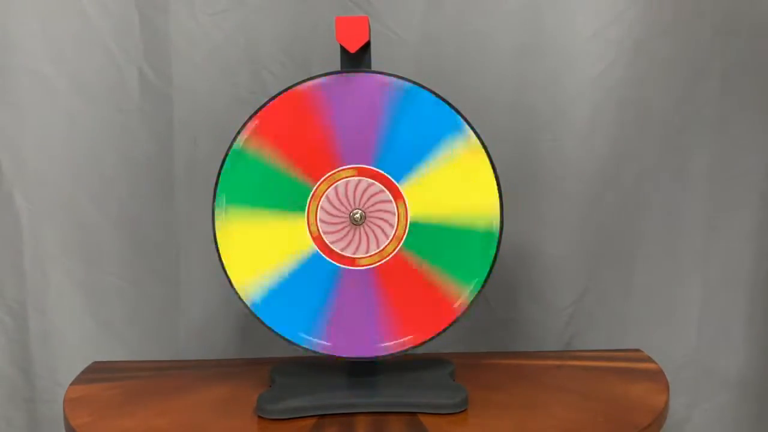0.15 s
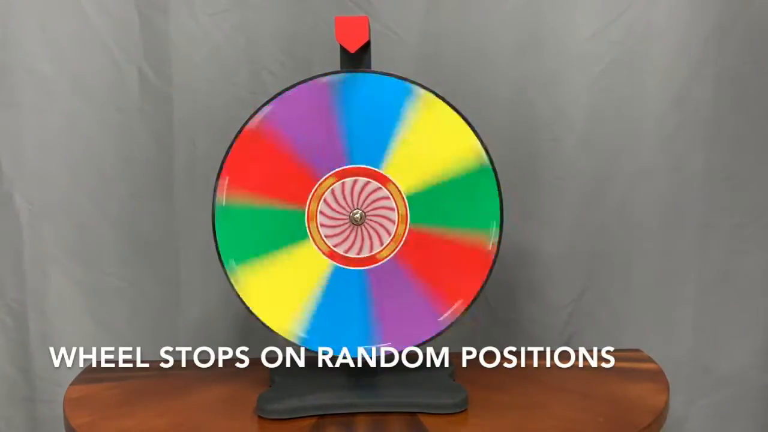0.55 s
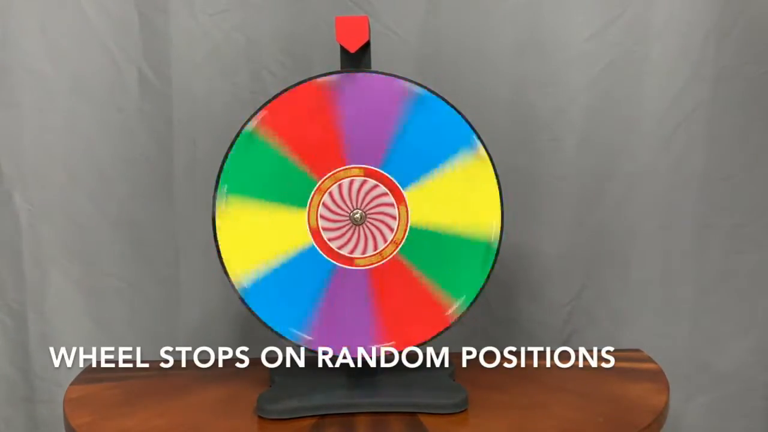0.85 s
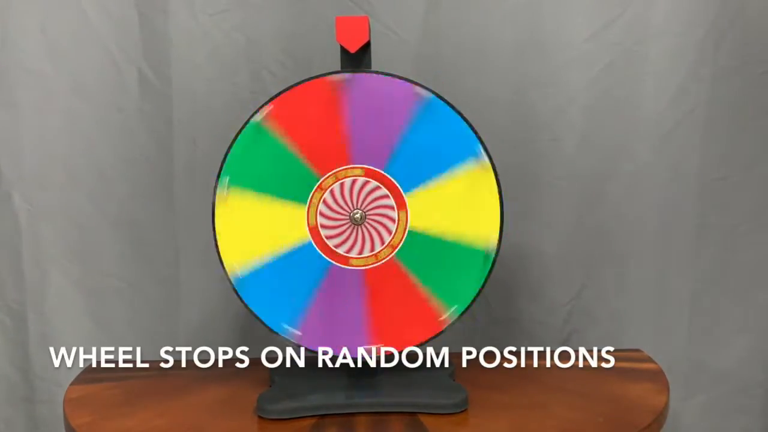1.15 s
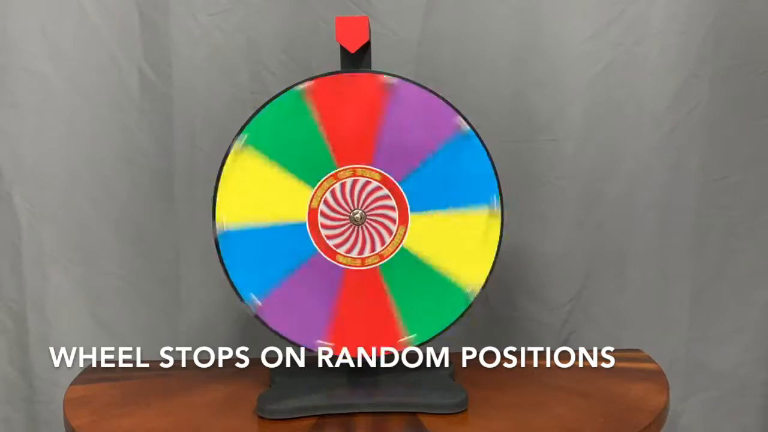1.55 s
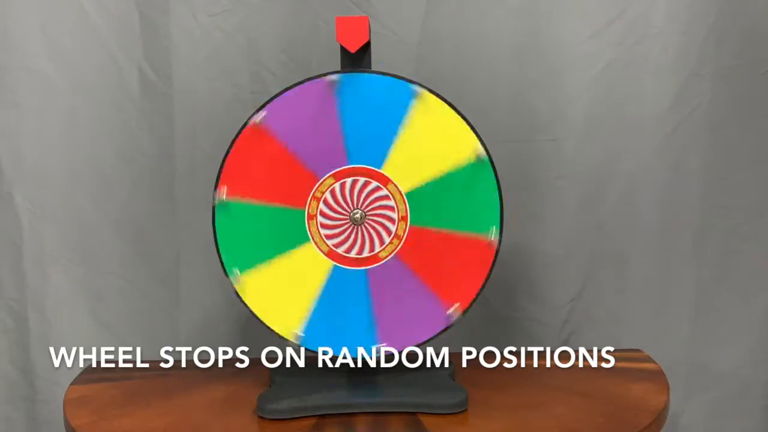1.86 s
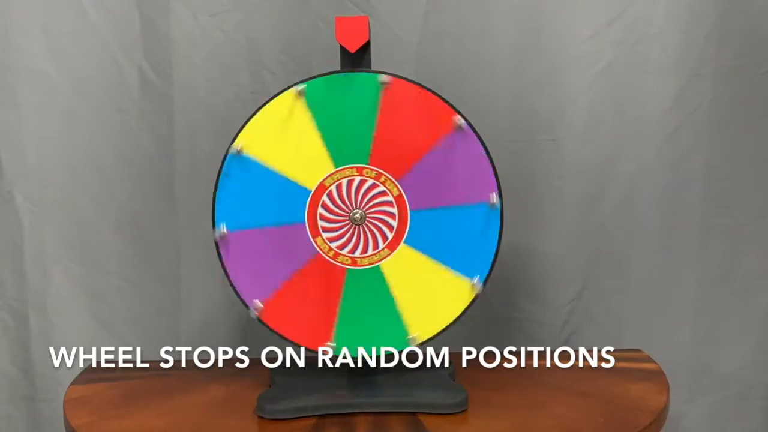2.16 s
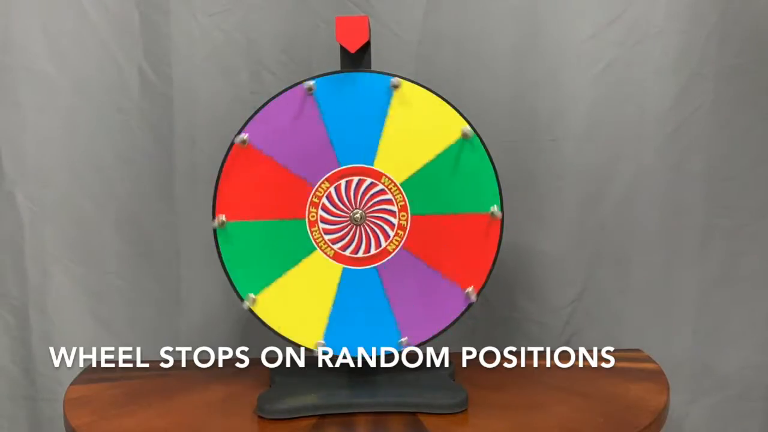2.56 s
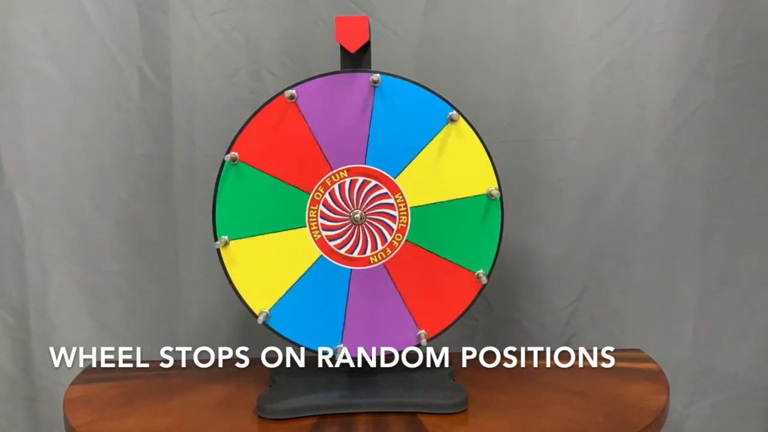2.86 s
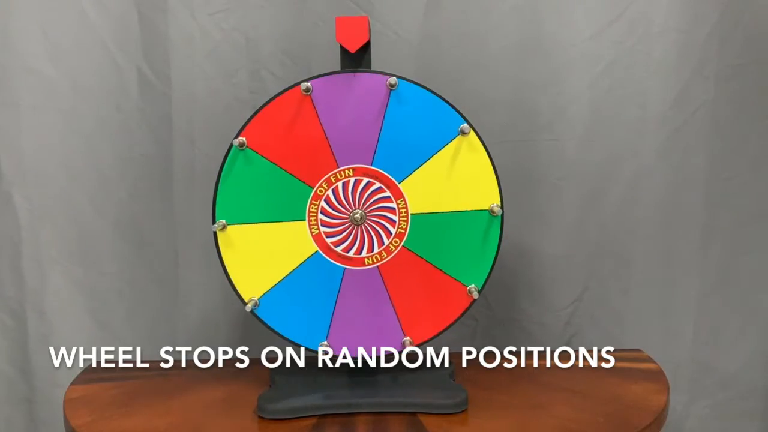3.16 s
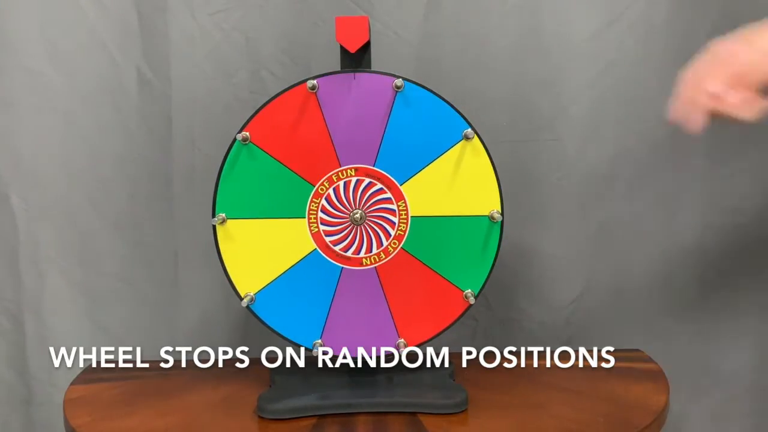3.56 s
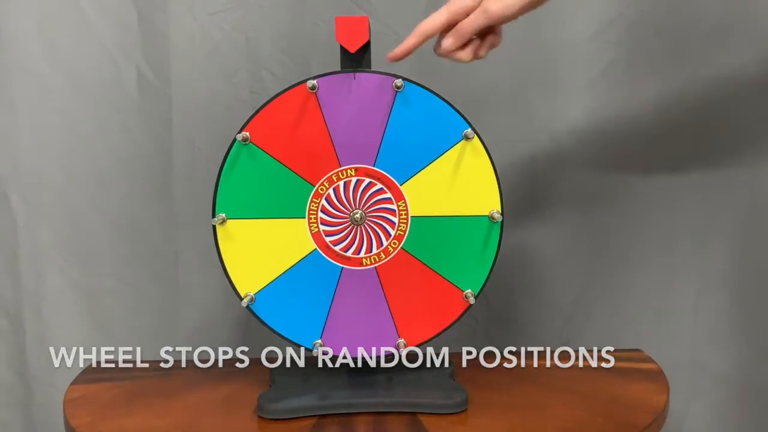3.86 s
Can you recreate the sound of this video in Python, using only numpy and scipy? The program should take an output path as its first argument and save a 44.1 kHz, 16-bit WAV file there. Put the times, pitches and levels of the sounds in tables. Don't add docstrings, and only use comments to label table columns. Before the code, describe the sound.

Close to the microphone, a spinning wheel ticks fast and bright against its flexible pointer, decelerating into spaced double click-knocks until it stops; then only faint low room rumble in a small indoor space.

```python
import sys
import numpy as np
from scipy import signal
from scipy.fft import rfft, irfft, next_fast_len
from scipy.io import wavfile
from scipy.ndimage import uniform_filter1d

SR = 44100
rng = np.random.default_rng(int(sys.argv[2]) if len(sys.argv) > 2 else 0)


def boost(x):
    u = np.asarray(x, float) / 20
    return 10 ** u


def transcribe(signal):
    frames = np.atleast_2d(signal).T
    limited = np.clip(frames, -1, 1)
    pcm = np.round(limited * 32767).astype(np.int16)
    wavfile.write(sys.argv[1], SR, pcm)


N = 176400


def evened(x):
    return x / np.sqrt(np.mean(x ** 2) + 1e-20)


def read(points, hz):
    f, value = np.transpose(points)
    return np.interp(np.log(hz + 1), np.log(f + 1), value)


def add(mix, s, sound):
    part = mix[max(round(s * SR), 0):][:len(sound)]
    part += sound[:len(part)]


def ring(modes, chance, push_s, spread_db, detune):
    t = np.arange(9000) / SR
    hz, db, t60 = np.transpose(modes)[:, :, None]
    weight = chance[:len(modes), None]
    shift = chance[::-1][:len(modes), None]
    decay = boost(db + spread_db * weight - 60 * t / t60)
    lines = decay * np.sin(2 * np.pi * hz * (1 + detune * shift) * t)
    onset = 1 - np.exp(-t / push_s)
    return onset * lines.sum(0) / np.sqrt(len(modes))


# f/Hz, lead of the left port [rad]
PORT_PHASE = [(0, 0), (2000, .2), (3000, 1.9), (5600, 2.6), (6900, -1.7), (8500, -3.14), (13000, -9.2),
              (13800, -9.6), (15300, -12.3), (17000, -12.6)]


def port_turn(hz):
    return np.exp(-1j * np.interp(hz, *np.transpose(PORT_PHASE)))


# f/Hz, level/dB per Hz
VENT_SPECTRUM = [(30, -35.5), (52, -4), (70, -3), (290, -18.5), (430, -36.5), (740, -43.5), (3000, -54),
                 (16000, -56)]
# f/Hz, left-right likeness [0 to 1]
VENT_COHERENCE = [(100, 0.94), (1200, 0.29), (9000, 0.24)]


def air():
    frames, hz = N // 512 + 5, np.fft.rfftfreq(2048, 1 / SR)
    a, b, c, d, patches = rng.standard_normal((frames, 1025, 5)).T
    patches = evened(uniform_filter1d(uniform_filter1d(patches, 8, 0), 6, 1))
    same = np.clip(read(VENT_COHERENCE, hz), -1, 1)[:, None]
    left = a + 1j * b
    own = c + 1j * d
    right = same * left * port_turn(hz)[:, None] + np.sqrt(1 - same ** 2) * own
    z = np.array([left, right]) * boost(read(VENT_SPECTRUM, hz)[:, None] + 1.2 * patches)
    level_db = -55
    return boost(level_db) * evened(signal.istft(z, nperseg=2048, noverlap=1536)[1][:, :N])


# t/s, level/dB
POINTER_IMPACTS = [(0.0003, -10.5), (0.0039, -19), (0.0372, -13), (0.041, -17), (0.0504, -23),
                   (0.0746, -16.5), (0.0772, -15.5), (0.0823, -17.5), (0.1118, -14.5), (0.116, -15.5),
                   (0.121, -22.5), (0.15, -15), (0.153, -14), (0.1622, -31.5), (0.1889, -13), (0.1923, -17.5),
                   (0.228, -14), (0.2348, -20.5), (0.2373, -12.5), (0.2686, -14.5), (0.2731, -20.5),
                   (0.274, -13.5), (0.3098, -17.5), (0.3142, -10.5), (0.326, -34.5), (0.3514, -22.5),
                   (0.3568, -11.5), (0.364, -30), (0.3936, -19.5), (0.396, -15), (0.4, -14.5), (0.436, -21),
                   (0.441, -12.5), (0.4475, -20), (0.4792, -17.5), (0.4852, -17), (0.492, -16),
                   (0.5225, -19.5), (0.5297, -19.5), (0.5367, -14), (0.57, -18.5), (0.5754, -15.5),
                   (0.5807, -17.5),
                   (0.6155, -21), (0.6217, -12.5), (0.6241, -16.5), (0.6692, -14.5), (0.675, -18),
                  (0.6787, -25.5), (0.7177, -13), (0.721, -18.5), (0.7688, -15), (0.7742, -15.5),
                  (0.776, -26), (0.8178, -17), (0.8207, -15.5), (0.829, -18), (0.8693, -19),
                  (0.8745, -12.5), (0.877, -19.5), (0.923, -19), (0.9271, -15.5), (0.9356, -19.5),
                  (0.9785, -19), (0.984, -15.5), (0.989, -16.5), (1.034, -22), (1.0405, -16.5),
                  (1.043, -13.5), (1.0898, -23.5), (1.099, -13), (1.102, -17.5), (1.158, -15),
                  (1.166, -20.5), (1.1685, -26.5), (1.22, -16), (1.2243, -21.5), (1.2288, -18),
                  (1.2837, -17), (1.2887, -19.5), (1.2928, -17.5), (1.3498, -17), (1.3556, -18.5),
                  (1.3611, -15.5),
                   (1.4186, -27), (1.426, -16.5), (1.4295, -17), (1.4975, -18), (1.5036, -16), (1.5077, -24.5),
                (1.5728, -21), (1.5812, -22), (1.5846, -17.5), (1.6519, -24), (1.6597, -24.5),
                (1.6636, -16), (1.7438, -22), (1.7486, -20), (1.7515, -18), (1.8306, -23.5), (1.8377, -16),
                (1.843, -17), (1.932, -18.5), (1.9377, -15), (1.9425, -27.5), (2.0323, -25.5),
                (2.0389, -23.5), (2.0486, -17.5), (2.1583, -21.5), (2.1678, -18), (2.3015, -25),
                (2.308, -25.5), (2.315, -21), (2.479, -40), (2.4868, -23.5), (2.498, -23.5), (2.7468, -31),
                (2.7527, -39.5), (2.7613, -28.5)]
# t/s, level/dB
STRAY_IMPACTS = [
    (1.9257, -40.5),
    (2.8588, -52),
]
IMPACTS = np.array(POINTER_IMPACTS + STRAY_IMPACTS)
# f/Hz, level/dB
IMPACT_SPECTRUM = [(1000, -27.5), (3000, -10), (6500, -7.5), (7800, -0.5), (9700, 0), (11800, -4.5),
                   (15400, -4), (16300, -34)]


def impacts():
    level_db, rise_s, t60_s = -2, 0.0007, 0.014
    rattle_db, rattle_t60_s = -11.5, 0.038
    t, power = np.arange(4000) / SR, np.zeros(N)
    decay = boost(-60 * t / t60_s) + boost(rattle_db - 60 * t / rattle_t60_s)
    burst = np.minimum(t / rise_s, 1) * decay
    for s, db in IMPACTS:
        add(power, s, (boost(db) * burst) ** 2)
    noise = np.sqrt(power) * rng.choice([-1., 1.], N)
    colour = boost(read(IMPACT_SPECTRUM, np.fft.rfftfreq(256, 1 / SR)))
    taps = np.roll(irfft(colour), 128) * np.hanning(256)
    return boost(level_db) * signal.oaconvolve(noise, taps / np.linalg.norm(taps), "same")


# f/Hz, level/dB, T60/s
PEG_MODES = [(9370, -11, 0.038), (10610, -4, 0.0084), (11680, -15, 0.017)]


def peg_ring(chances):
    out = np.zeros(N)
    for (s, db), chance in zip(IMPACTS, chances):
        add(out, s, boost(db + 7.5) * ring(PEG_MODES, chance[3:], 0.0004, 2.2, 0.011))
    return out


# f/Hz, level/dB, T60/s
POINTER_MODES = [(1517, 1, 0.019), (1798, -6.5, 0.042), (2143, -20, 0.076), (2783, -14, 0.069),
                 (3463, -9, .05), (4024, -4.5, 0.06), (4214, -5, 0.033)]


def pointer_ring(chances):
    roughness = 0.65
    out = np.zeros(N)
    for (s, db), chance in zip(IMPACTS, chances):
        add(out, s, boost(db + 4) * ring(POINTER_MODES, chance, 0.0083, 2, 0.02))
    flutter = evened(uniform_filter1d(rng.standard_normal(N), size=70))
    return out * (1 - roughness / 2 + roughness * flutter)


# t/s, level/dB of the low, middle and high disc mode
PEG_STRIKES = [(0.0004, -40, -42.5, -56), (0.0365, -52.5, -45.5, -49), (0.0723, -38, -40.5, -50.5),
               (0.1098, -45.5, -47.5, -51.5), (0.147, -34, -46, -53.5), (0.1882, -35, -44.5, -57.5),
               (0.2291, -49.5, -30.5, -35), (0.2664, -37, -39, -53.5), (0.3069, -33, -44.5, -38.5),
               (0.3484, -42.5, -38.5, -47), (0.3919, -50.5, -41.5, -61), (0.434, -48.5, -35.5, -50),
               (0.4786, -39.5, -41, -46.5), (0.5235, -42.5, -45, -44.5), (0.5678, -42, -42, -50),
               (0.6149, -44.5, -49, -53.5), (0.6695, -41.5, -34.5, -48.5), (0.7176, -33.5, -43.5, -54.5),
               (0.7667, -37, -47, -40), (0.818, -38.5, -38, -49), (0.8698, -39.5, -38, -54),
               (0.9233, -42.5, -49, -57), (0.9772, -40, -45, -48.5), (1.0342, -36.5, -55.5, -39),
               (1.0898, -34.5, -49.5, -57), (1.1593, -35, -51, -59), (1.2201, -39, -43, -46),
               (1.284, -47, -48, -48), (1.3495, -36.5, -45, -41), (1.4192, -37.5, -45, -44),
               (1.497, -42.5, -44, -46), (1.5736, -64, -47, -59), (1.653, -36.5, -42, -45),
               (1.7422, -47.5, -46, -53), (1.8313, -43.5, -50, -46), (1.9323, -45.5, -42, -59),
               (2.0334, -71, -44, -48), (2.159, -40.5, -46, -53), (2.3003, -39, -52, -42),
               (2.4806, -44, -45.5, -47.5), (2.7479, -46.5, -56, -60)]
# f/Hz, T60/s
DISC_MODES = [(463, 0.081), (577, 0.074), (944, 0.067)]
SWELL_LATE_S = 0.00502


def disc_ring():
    out = np.zeros(N)
    for (s, *levels), chance in zip(PEG_STRIKES, rng.standard_normal((len(PEG_STRIKES), 16))):
        modes = [(hz, db, t60) for (hz, t60), db in zip(DISC_MODES, levels)]
        add(out, s + SWELL_LATE_S, boost(21.5) * ring(modes, chance, 0.014, 0, 0.006))
    return out


# knock level/dB, disc hum level/dB
FAST_BODY = [(-32, -30), (-37.5, -53.5), (-33.5, -30), (-31.5, -44.5), (-33, -41.5), (-32, -41.5),
             (-35, -49), (-32, -34.5), (-29.5, -40.5), (-35, -33), (-39, -43), (-36.5, -33.5),
             (-37.5, -26.5), (-29.5, -33), (-30.5, -40.5), (-34, -31), (-34.5, -50.5), (-37, -35),
             (-33.5, -50), (-28.5, -37), (-42, -30.5)]
# knock t/s, knock level/dB, disc hum level/dB
SLOW_BODY = [(0.94, -39.5, -51.5), (0.988, -33.5, -29.5), (1.055, -32, -53), (1.111, -31, -47),
             (1.172, -28, -45), (1.235, -33, -57), (1.3, -32, -33), (1.372, -30.5, -46),
             (1.435, -30.5, -71), (1.513, -33.5, -32), (1.597, -36.5, -41), (1.681, -36.5, -41),
             (1.768, -34, -78), (1.858, -34, -40.5), (1.956, -32.5, -37), (2.069, -31, -48),
             (2.194, -31, -35), (2.346, -29, -42), (2.541, -27.5, -44.5), (2.859, -29, -39.5)]
# f/Hz, level/dB, T60/s
HUM_MODE = [(835, 3.5, 0.04)]


def disc_hum(chances):
    out = np.zeros(N)
    levels = [row[-1] for row in FAST_BODY] + [row[-1] for row in SLOW_BODY]
    for peg, db, chance in zip(PEG_STRIKES, levels, chances):
        add(out, peg[0] + SWELL_LATE_S, boost(db + 9) * ring(HUM_MODE, chance, 0.0055, 0, 0.0016))
    return out


# f/Hz, level/dB, T60/s
STAND_MODES = [(432.3, -0.5, 0.054), (472.3, 5.5, 0.032), (601.5, -4.5, 0.054), (711.3, -17.5, 0.37),
               (821.4, -7, 0.18)]
# f/Hz, level/dB, T60/s
FOOT_MODES = [(185, -13.5, 0.49), (246.1, 5, 0.067), (295.7, -1, 0.067)]
# f/Hz, level/dB, T60/s
SNAP_MODES = [(1430, -4.5, 0.066), (1710, -3.5, 0.09), (2170, -4, 0.14), (2660, -3.5, 0.1), (2730, 1, 0.1)]


def knocks(chances):
    crack_db, crack_t60_s = -17.5, 0.062
    slip = 0.32
    strikes, out = np.array(PEG_STRIKES)[:, 0], np.zeros(N)
    slip_times = (strikes + slip * np.gradient(strikes))[:len(FAST_BODY)]
    rows = np.vstack([np.c_[slip_times, FAST_BODY], SLOW_BODY])
    t, band = np.arange(5000) / SR, signal.butter(3, (1300, 3000), "band", fs=SR)
    for (s, db, _), chance in zip(rows, chances):
        add(out, s, boost(db + 5) * ring(STAND_MODES, chance, 0.0032, 4.8, 0.0045))
        foot_db = 5.5 if s < SLOW_BODY[0][0] else 1.5
        add(out, s, boost(db + foot_db) * ring(FOOT_MODES, chance[20:], 0.0024, 2.7, 0.02))
        crack = boost(db + crack_db - 60 * t / crack_t60_s)
        add(out, s, crack * signal.lfilter(*band, chance))
    add(out, rows[-1, 0], boost(-43) * ring(SNAP_MODES, chance, 0.0029, 1.5, 0.0045))
    return out


# f/Hz, T60/s
ROOM_T60 = [(300, 0.27), (2000, 0.3), (4000, 0.53), (10000, .21)]
# f/Hz, level/dB
REVERB_LEVEL = [(300, -6.5), (2500, -4), (9000, -9.5), (15000, -13.5)]
# f/Hz, left-right likeness [0 to 1]
ROOM_COHERENCE = [(200, .98), (700, .84), (2000, .4), (6200, .35), (8500, .99), (10500, .86), (13400, .99),
                  (15500, .85)]
# f/Hz, left minus right level/dB
PORT_LEAN = [(1000, 0), (5000, -3.5), (7000, 0)]


def room(x):
    taps = np.zeros((2, SR // 2))
    at = np.arange(120, SR // 2 - 20, 10)
    places = at + rng.integers(0, 10, (2, len(at)))
    np.put_along_axis(taps, places, rng.choice([-1., 1.], (2, len(at))), 1)
    hz, t, z = signal.stft(taps, SR, nperseg=256)
    z = z * boost(-60 * t / read(ROOM_T60, hz)[:, None])
    z = z / np.sqrt((abs(z) ** 2).sum(2).mean(0))[:, None]
    tail = signal.istft(z, SR, nperseg=256)[1]
    size = next_fast_len(N + SR)
    hz = np.fft.rfftfreq(size, 1 / SR)
    shared, own = rfft(tail / np.linalg.norm(tail[0]), size) * boost(read(REVERB_LEVEL, hz))
    early_t60_s = 0.056
    early = taps[1, 120:2120] * boost(-60 * np.arange(2000) / SR / early_t60_s)
    early = rfft(early / np.linalg.norm(early), size)
    same = np.clip(read(ROOM_COHERENCE, hz), 0, 1)
    lean = boost(read(PORT_LEAN, hz) / 2)
    left = (1 + shared) * lean
    right = same * (1 + shared) + np.sqrt(1 - same ** 2) * (early + own)
    ports = np.array([left, right * port_turn(hz) / lean])
    return irfft(rfft(x, size) * ports, size)[:, :N]


def scene():
    blows = rng.standard_normal((len(IMPACTS), 16))
    struck = disc_ring() + impacts() + peg_ring(blows) + pointer_ring(blows)
    slips = rng.standard_normal((len(PEG_STRIKES), 5000))
    released = disc_hum(slips) + knocks(slips)
    return room(struck + released) + air()


def roll_off(x):
    return signal.sosfilt(signal.butter(12, 17150, fs=SR, output="sos"), x)


def record(dry):
    overloaded = np.tanh(2 * dry) / 2
    edge_hz = 17000
    lowpass = signal.firwin(255, edge_hz, window=("kaiser", 9), fs=SR)
    mix = signal.oaconvolve(overloaded, lowpass[None], "same")
    return roll_off(mix)


dry = scene()
out = record(dry)
transcribe(out)
```